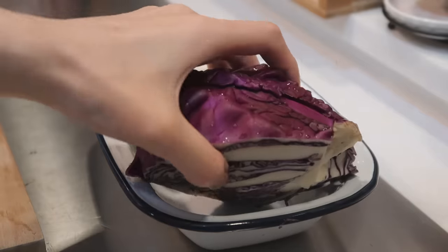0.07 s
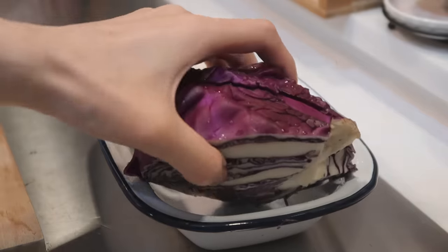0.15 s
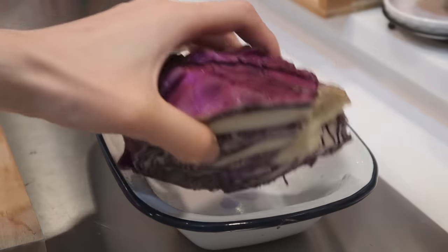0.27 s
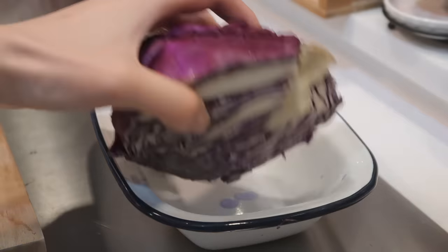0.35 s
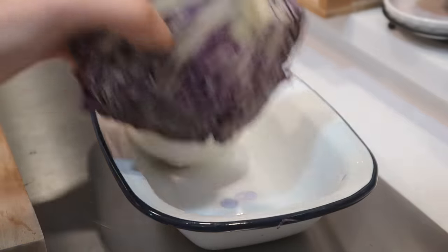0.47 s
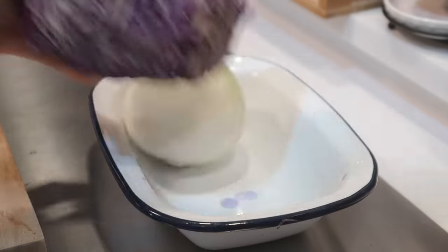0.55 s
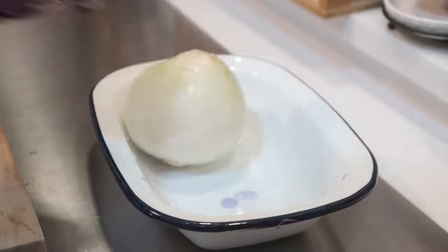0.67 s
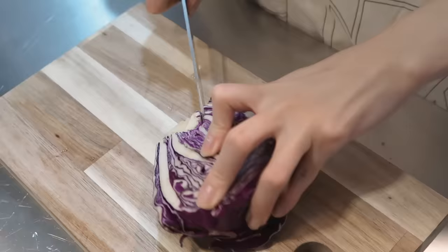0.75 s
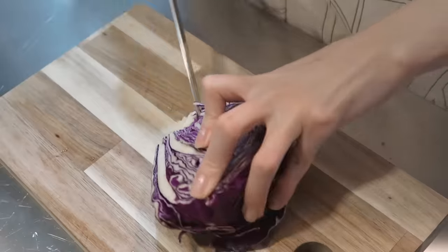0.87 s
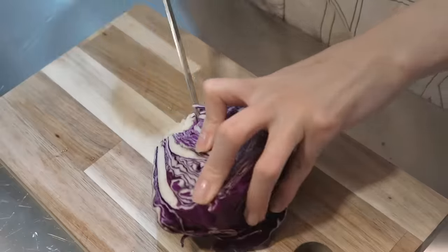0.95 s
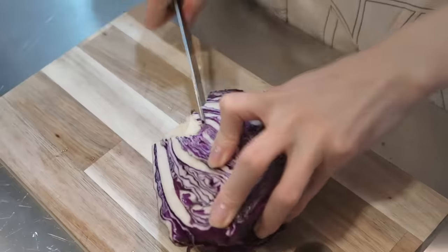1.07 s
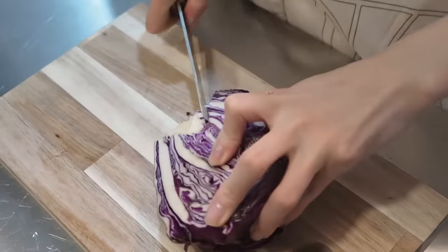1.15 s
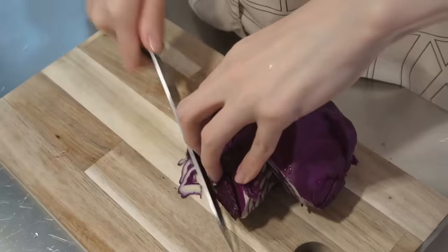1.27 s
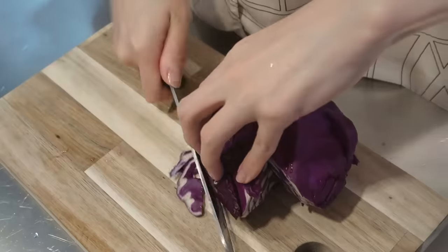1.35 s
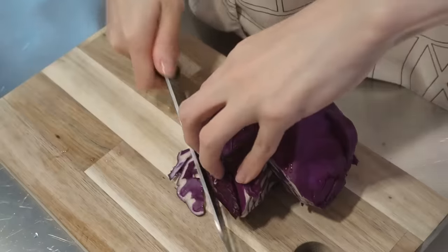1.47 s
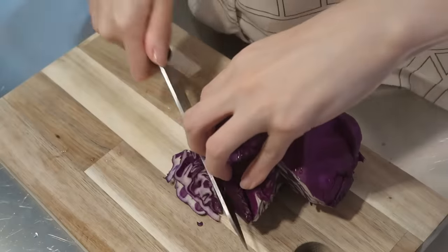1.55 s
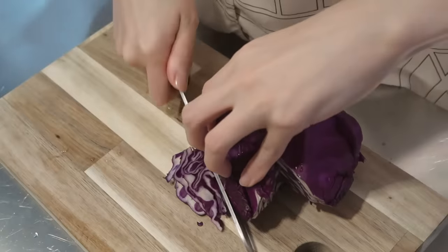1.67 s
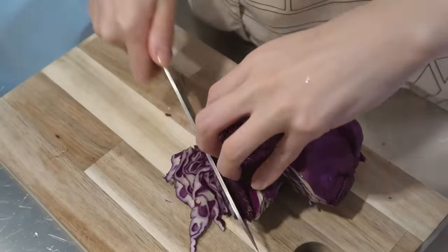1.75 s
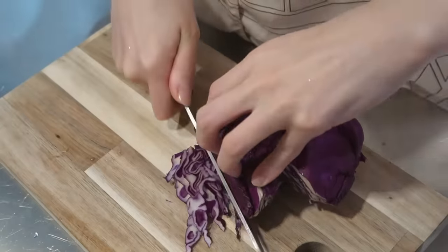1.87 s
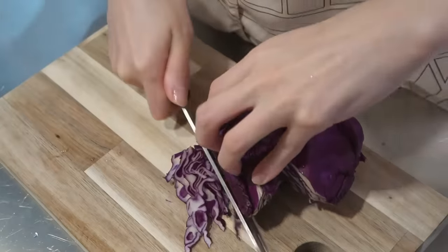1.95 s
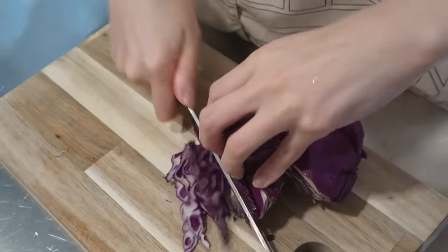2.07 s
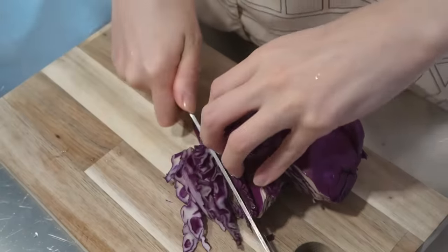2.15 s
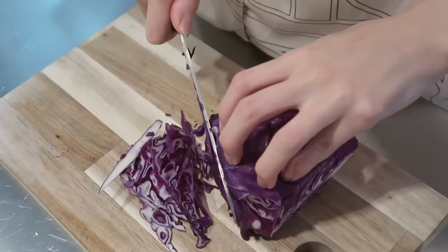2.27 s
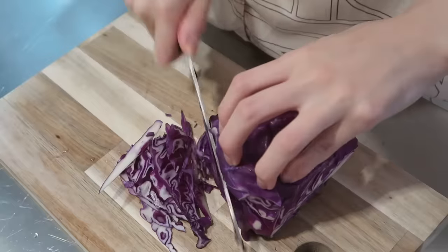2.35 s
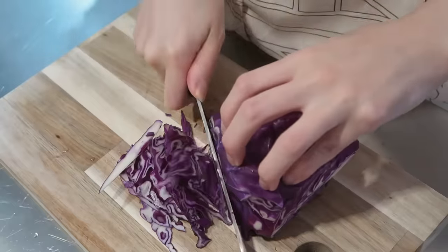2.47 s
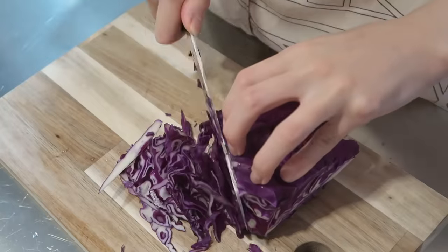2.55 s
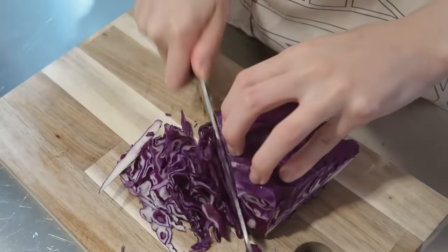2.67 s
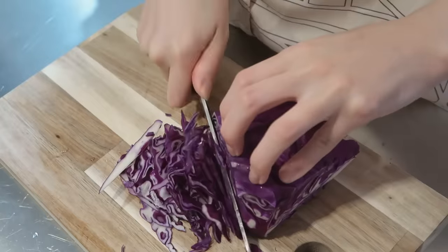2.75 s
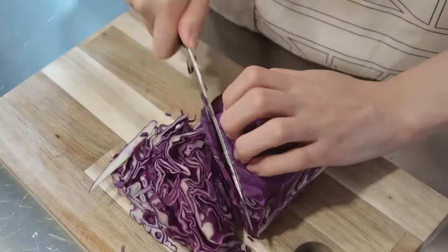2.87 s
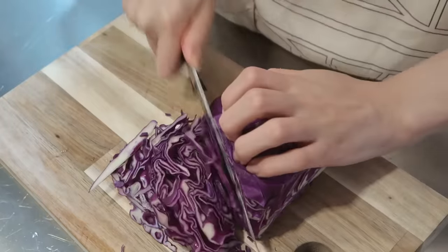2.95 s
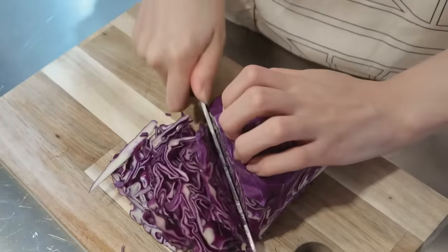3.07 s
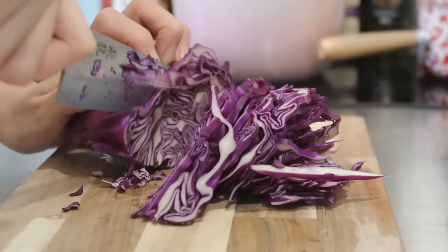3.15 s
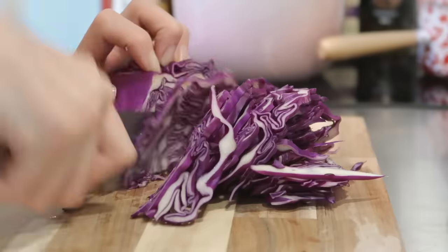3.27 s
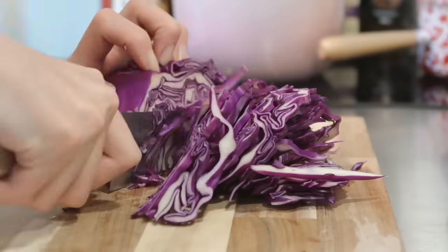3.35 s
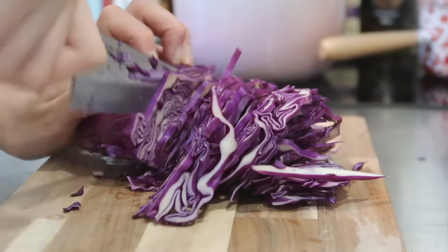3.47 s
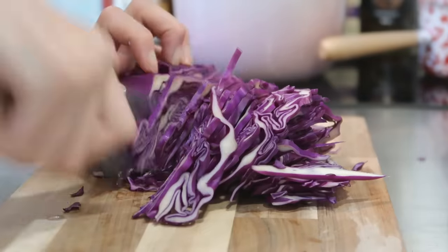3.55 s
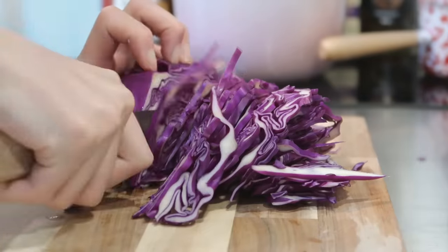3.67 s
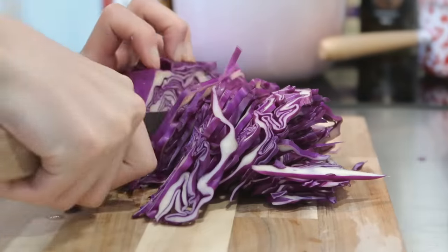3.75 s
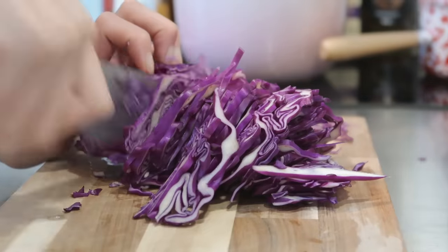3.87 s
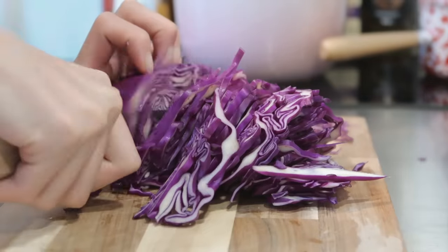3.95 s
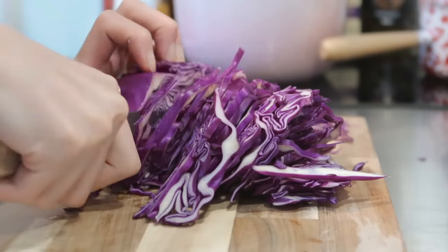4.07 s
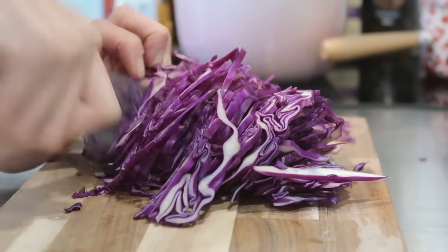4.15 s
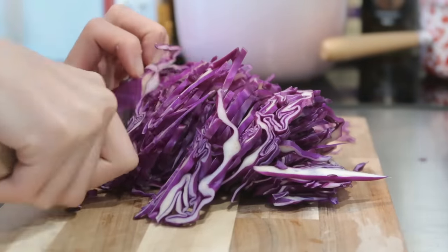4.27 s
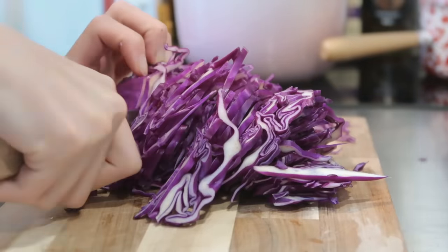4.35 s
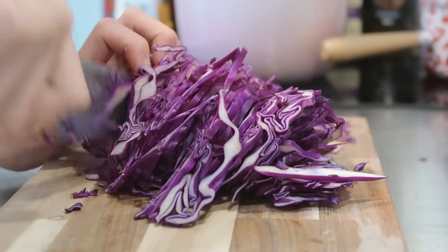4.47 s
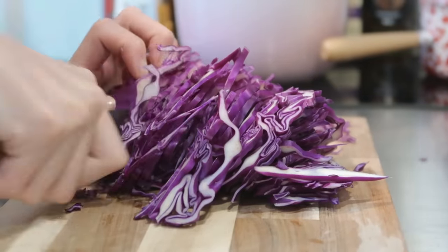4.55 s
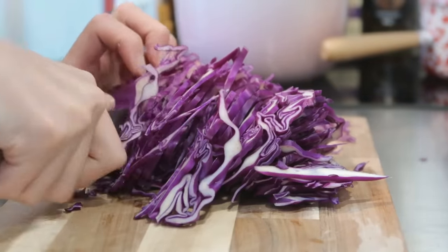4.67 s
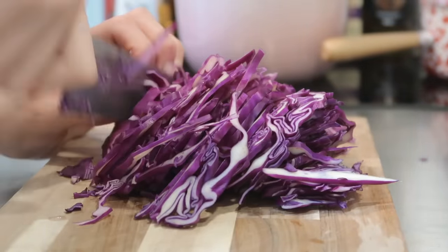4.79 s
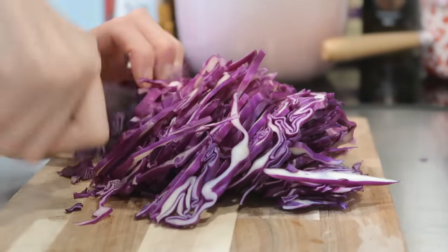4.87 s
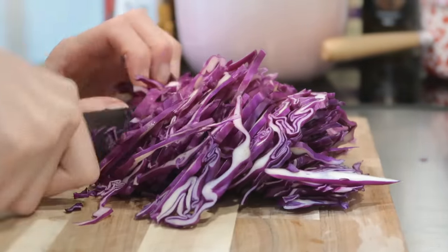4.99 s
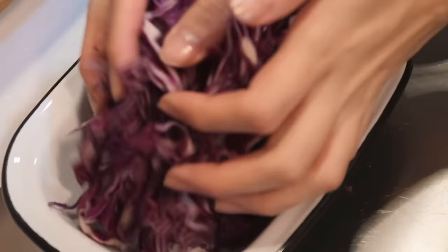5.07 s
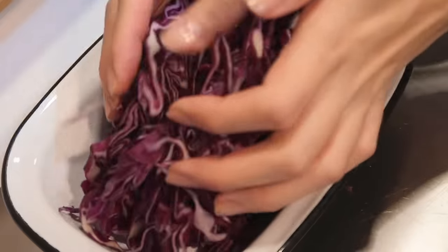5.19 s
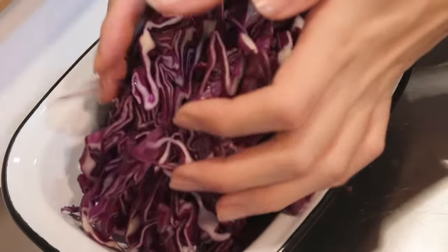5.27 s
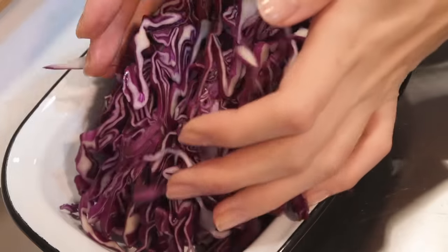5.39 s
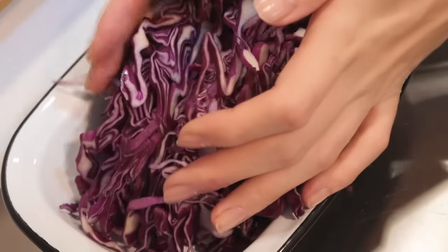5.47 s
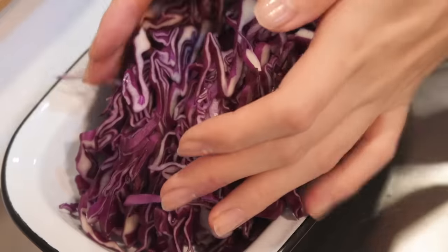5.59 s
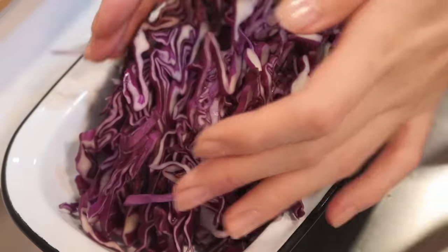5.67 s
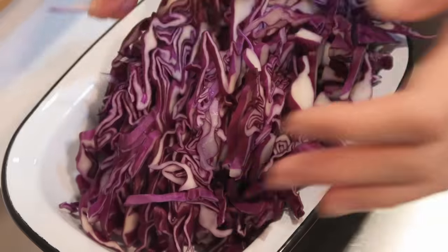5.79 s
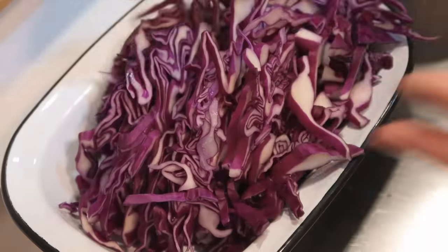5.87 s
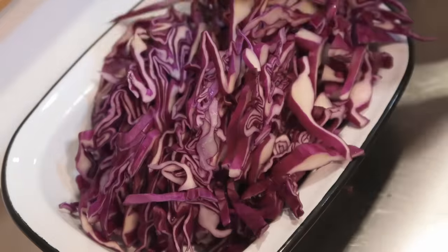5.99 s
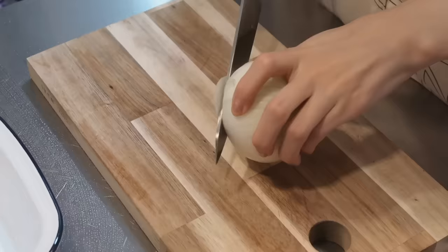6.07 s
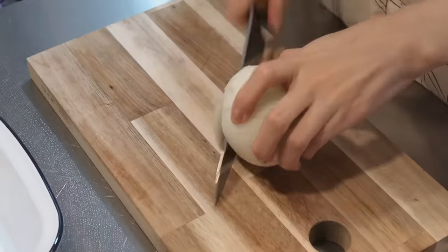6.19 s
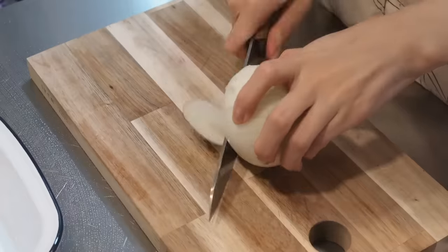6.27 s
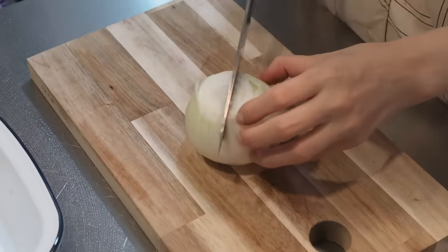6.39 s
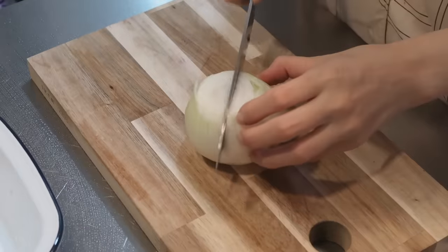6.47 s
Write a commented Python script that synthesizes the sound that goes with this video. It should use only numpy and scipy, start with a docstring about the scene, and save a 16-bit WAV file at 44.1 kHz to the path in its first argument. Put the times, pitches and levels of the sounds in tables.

```python
"""Crisp crunches and wooden knocks: a knife shreds red cabbage on a board, then starts on an onion.
Each stroke is a swelling crunch of bursting cells; most end with the blade knocking on the board,
and the walls of a small kitchen ring briefly. Behind it a refrigerator hums in the room tone,
which sinks after a knock and is back with the next stroke."""
import sys
import numpy as np
from scipy import signal
from scipy.fft import rfft, irfft
from scipy.io import wavfile
from scipy.ndimage import uniform_filter1d

SR = 44100
rng = np.random.default_rng(int(sys.argv[2]) if len(sys.argv) > 2 else 0)


def file_out(sig):
    """Save sig as 16-bit WAV at sys.argv[1]."""
    # one column per channel
    cols = np.atleast_2d(sig).T
    # limit, then scale
    lim = np.clip(cols, -1, 1)
    pcm = np.round(lim * 32767).astype(np.int16)
    wavfile.write(sys.argv[1], SR, pcm)


N = 287866

# Blade through the vegetable. Each row: bite in seconds, level in dB, through in seconds, level in dB,
# brightness in dB, rise to the bite in dB/s, final decay in dB/s, treble lost afterwards in dB.
CUT_STROKES = [(0.882, -40, 0.905, -39, -2.5, 3000, 200, 2), (1.05, -40, 1.1, -24, 1, 500, 450, 6),
               (1.3, -40, 1.35, -34.5, 3, 600, 300.5, 12.5), (1.652, -42, 1.678, -29, 5.5, 900, 400, 8),
               (1.787, -42, 1.827, -34.5, 0.5, 4998, 281, 3),
               (2.093, -42.5, 2.111, -33, 4, 699.5, 399, 7.5),
               (2.371, -43.5, 2.47, -31, -0.5, 899, 449.5, 15), (2.64, -44, 2.772, -31, 3, 700, 380, 8),
               (2.98, -40, 3.06, -29, 1, 700, 500, 12), (3.26, -38, 3.34, -26, 3, 500, 450, 11),
               (3.57, -36, 3.642, -27.5, 4, 600, 420, 10), (3.92, -37, 3.992, -27, 3, 800, 420, 9),
               (4.162, -40.5, 4.249, -29.5, 6, 1500, 309, 3), (4.55, -38, 4.585, -27, 6, 700, 450, 10),
               (4.83, -39, 4.925, -33, 7, 3000, 130, 1), (5.16, -48, 5.19, -44, 6, 700, 400, 0),
               (6.202, -31, 6.345, -31, -1, 30000, 450, 8), (6.425, -37, 6.53, -32, 0, 30000, 300, 0)]
# Edge set on the leaves. Each row: start in seconds, level in dB, fade in dB/s, brightness in dB.
LEAF_RUSTLES = [(0.81, -41.5, 62, -0.5), (0.999, -53, 346, -5), (1.205, -60.5, 124, 5), (1.268, -46, 14, 2),
                (1.485, -59, 202, 1), (1.545, -41.5, 36, 4.5), (2.025, -45, -4, 3), (2.306, -51, 304.5, 1),
                (2.586, -57, 293, 2), (2.905, -49, 100, 0.5), (3.185, -53.5, 111, 6.5),
                (3.509, -49.5, 305, 1.5), (3.74, -62, 161, 8), (3.826, -46, 165, 3.5), (4.09, -62.5, 98, 9),
                (4.426, -55.5, 103, 10), (4.743, -58, 63, 3.5), (4.801, -47, 200, 4),
                (5.057, -50, 155, 14.5), (5.104, -42.5, 53, -1.5), (6.105, -54, 37, 4.5)]
# Crunch spectra. Each row: frequency in Hz, relative density in dB.
CABBAGE_SPECTRUM = [(150, -43), (250, -19.5), (850, -12.5), (1150, -5.5), (1470, 4), (2760, 0.5),
                    (4730, -7.5), (11700, -25.5), (14900, -27), (16000, -53)]
ONION_SPECTRUM = [(300, -20), (1000, -22.5), (1600, -4), (2500, -3), (4000, 2.5), (5500, -7), (9000, -20.5),
                  (15000, -62)]
# Resonances under the blade. Each row: frequency in Hz, width in Hz, gain in dB.
CABBAGE_PEAKS = [(1260, 28, -12.5), (2150, 280, -10.5), (2700, 210, -10), (3160, 55, -10)]
ONION_PEAKS = [(2750, 320, -3.5), (3900, 410, -4), (4570, 190, -21)]
# Leaf ribs snapping or the edge touching. Each row: start in seconds, gain in dB, pitch in Hz.
RIB_SNAPS = [(0.2988, -25, 2480), (0.8275, -21, 2150), (0.852, -30.5, 2400), (0.8648, -24, 2500),
             (0.8818, -19.5, 2330), (0.8983, -13.5, 2380), (0.935, -24, 2750), (1.051, -25.5, 3080),
             (1.075, -11, 2500), (1.096, -9, 2700), (1.643, -19.5, 2090), (1.7921, -28, 2150),
             (1.81, -22, 2000), (2.4415, -19, 3000), (2.751, -18, 2500), (3.297, -20.5, 2000),
             (3.5468, -33, 2730), (3.9283, -26, 1644), (3.941, -19.5, 2700), (4.1602, -31.5, 2610),
             (4.559, -30.5, 2480), (4.827, -20, 2020), (4.992, -17.5, 2130), (5.178, -28, 2870),
             (6.16, -25, 3800), (6.2022, -11.5, 3900), (6.2399, -5.5, 3660), (6.327, -19.5, 3660)]
# Blade on the board. Each row: start in seconds, gain in dB, six band gains in dB, bounce gain in dB.
BOARD_KNOCKS = [(1.102, -2.5, -8.5, -15.5, -9.5, 2.5, -1, -9, -8.5),
                (1.367, -2.5, -14, -21, -6, -5.5, 1.5, -7, -22),
                (1.6861, 2, -15.5, -24, -6, -5.5, -0.5, -4.5, -14),
                (1.853, -0.5, -19, -18.5, -8.5, -10, -0.5, -2.5, -13.5),
                (2.114, -3.5, -17, -19, -9.5, -6.5, -0.5, -7, -21.5),
                (2.461, -2.5, -15, -19.5, -3.5, -6.5, -1.5, -8.5, -22),
                (2.7708, 0.5, -20.5, -17, -11, -3, -1, -6, -19),
                (3.06, -2.5, -12.5, -14.5, -10, 5.5, -4.5, -6, -13.5),
                (3.343, -7.5, -19.5, -7.5, -10, -2, -4, -29, -9.5),
                (3.643, -3.5, -26.5, -8.5, -13.5, -6.5, -7, -18, -10.5),
                (3.993, -6, -33, -5, -15.5, -4.5, -12, -32, -11.5),
                (4.2567, -7.5, -14, -2.5, -10.5, -2.5, -16.5, -18, -11.5),
                (4.5878, -2, -22.5, -9, -15, -4, -17.5, -34, -11),
                (4.9254, -13, -29, -3, -17.5, -24, -40, -10, -1.5),
                (5.082, -25, -3, 6, -13, -4, -25, -24, -9.5),
                (5.106, -20, 3.5, -4.5, -1.5, -13.5, -18, -35, -10),
                (6.2659, -0.5, -5, -6.5, -26, -6.5, -4.5, -22, -7)]
# Centres of those six bands in Hz.
KNOCK_CENTRES_HZ = [280, 480, 730, 1100, 2500, 6000]
# A deep thump, then the board's modes. Each row: frequency in Hz, gain in dB, T60 in seconds.
KNOCK_RESONANCES = [(55.6, -17.5, 0.072), (258, -17.5, 0.073), (339, -19.5, 0.12), (449.2, -9, 0.074),
                    (569.3, 0, 0.041), (736, 3, 0.02), (954, -5, 0.038), (1026, -8.5, 0.04),
                    (1120, -5.5, 0.031), (1242, -3.5, 0.028), (1350, -9, 0.026), (1680, -5.5, 0.022),
                    (2090, -9.5, 0.019), (2364, 1.5, 0.015), (2480, 1, 0.0094), (2554, 3, 0.014),
                    (3040, -7, 0.0022), (3066, -12, 0.025)]
# Walls answering a knock. Each row: frequency in Hz, gain in dB, T60 in seconds.
WALL_RING = [(254, -33.5, 0.45), (525, -17.5, 0.23), (990, -22, 0.15), (1700, -21.5, 0.1),
             (2500, -21.5, 0.073), (5000, -31.5, 0.098), (10080, -35.5, 0.068)]
# Room tone envelope. Each row: return in seconds, top level in dB, sink start in seconds, sink in dB/s.
ROOM_SWELLS = [(0, -46.5, .78, 0), (.79, -52.5, 1.152, 115), (1.27, -53, 1.33, 60), (1.55, -47, 1.69, 52),
               (2.03, -55, 2.08, 50), (2.31, -47, 2.46, 200), (2.59, -47, 2.77, 170), (2.91, -57, 3.07, 5),
               (3.19, -49, 3.33, 35), (3.51, -50, 3.6, 40), (3.83, -50, 3.97, 5), (4.8, -45, 4.93, 1),
               (6.11, -45, 6.25, 14)]
# Air noise. Each row: frequency in Hz, relative density in dB.
AIR_SPECTRUM = [(12, -40.5), (24, -9), (107, -8.5), (347, -19), (422, -24), (574, -12.5), (678, -27.5),
                (873, -23), (2910, -38), (10500, -52), (16000, -64.5)]
# Two hum lines and a low room rumble. Each row: frequency in Hz, width in Hz, steady share from 0 to 1.
HUM_AND_RUMBLE = [(118.5, 7.8, 0.79), (582, 13, 0.2), (54, 32, 0.3)]
# Their balance. Each row: time in seconds, then the gain of each over the air noise in dB.
HUM_AND_RUMBLE_GAINS = [(.78, 4, -13, -11), (0.801, -1.5, -5.5, -5.5), (5.1, 1.5, -13.5, -5.5),
                        (5.201, -6, -20, -2.5)]
# Scattered sound. Each row: frequency in Hz, gain against the shared sound in dB.
SCATTER_SPECTRUM = [(30, -22), (60, -34.5), (150, -16.5), (300, -6), (600, -16), (1200, -12.5),
                    (2000, -21.5), (4000, -2), (8000, 2), (12000, 6.5)]

ONION_FROM_S = 6.1
DULLING_S, RUSTLE_STOP_DB_PER_S = 0.049, 600
CLUMPS_DB, CLUMP_S = 1, 0.0089   # leaves give way unevenly, pitch by pitch
TEARS_DB, TEAR_S = 1.5, 0.007   # whole layers tear at once
BANDS_DB, BAND_S = 0.88, 0.046   # some pitches stand out for a while
CRACKLE_PER_S, CRACKLE_DB = 180, -1   # fibres snap across many pitches at once
CONTACT_LOW_RATIO, CONTACT_TOP_HZ = 0.41, 4900   # drive band of the soft landing
HOLLOW_BELOW_HZ, HOLLOW_FIRST_DB, HOLLOW_BOUNCE_DB = 650, -1, 7.5   # low resonances favour the bounce
DETUNE = 0.027   # modes shift with the place of the blow and the load of leaves
BLADE_HZ, BLADE_WIDTH_HZ, BLADE_DB, BLADE_T60_S = 2660, 110, -29, 0.16
FAR_RING_DB, FAR_RING_T60_S = -37.5, 0.55
ROOM_RISE_DB_PER_S = 51
LEFT_LAG_S = 14e-6
CABBAGE_CEILING, ONION_CEILING, CUTOFF_HZ = 0.55, 0.51, 16800


def crunch(bursts_per_s, spread_db, ring_cycles, swell_cycles):
    """Cells burst at random; each rings a few cycles at a pitch of its own."""
    level_db, bright_db = crunch_envelope()
    clumps_db = CLUMPS_DB * wander(CLUMP_S) + BANDS_DB * wander(BAND_S)
    tears_db = TEARS_DB * wander(TEAR_S)
    crackle = (rng.random(N) < CRACKLE_PER_S / SR) * amp(CRACKLE_DB + 2.4 * rng.standard_normal(N))
    crackle *= rng.choice([-1, 1], N)
    bursts = (rng.random(N) < bursts_per_s / SR) * amp(spread_db * np.minimum(rng.exponential(1, N), 4))
    bursts *= rng.choice([-1, 1], N)
    pitches_hz, burst_band = np.geomspace(300, 15000, num=24), rng.integers(0, 24, N)
    cabbage = amp(at_hz(CABBAGE_SPECTRUM, pitches_hz)) * np.sqrt(pitches_hz)
    onion = amp(at_hz(ONION_SPECTRUM, pitches_hz)) * np.sqrt(pitches_hz)
    on_onion = np.arange(N) >= ONION_FROM_S * SR
    out = np.zeros(N)
    for k, hz in enumerate(pitches_hz):
        clicks = bursts * (burst_band == k) + crackle * (1000 < hz < 7000) / 2
        cells = ring(ring(clicks, hz, ring_cycles / hz), hz, swell_cycles / hz)
        weight = np.where(on_onion, onion[k] / np.linalg.norm(onion),
                          cabbage[k] / np.linalg.norm(cabbage))
        treble_octaves = np.clip(np.log2(hz / 2600), 0, 1.3)
        band_db = level_db + treble_octaves * bright_db + tears_db + np.roll(clumps_db, k * N // 24)
        out += weight * amp(band_db) * rms_one(cells)
    return np.where(on_onion, amp(-3) * rasp(out, ONION_PEAKS), amp(-1.9) * rasp(out, CABBAGE_PEAKS))


def crunch_envelope():
    """Level and brightness in dB of the loudest rustle or cut at each moment."""
    t, shapes = np.arange(N) / SR, []
    ends_s = np.array(CUT_STROKES)[:, 2]
    for start_s, db, fade, tilt_db in LEAF_RUSTLES:
        after_cut_s = np.maximum(t - ends_s[ends_s > start_s].min(), 0)
        rustle_db = db - fade * (t - start_s) - RUSTLE_STOP_DB_PER_S * after_cut_s
        shapes.append((np.where(t >= start_s, rustle_db, -120.), tilt_db))
    for bite_s, bite_db, through_s, through_db, tilt_db, rise, decay, dulling_db in CUT_STROKES:
        early_s, late_s = np.maximum(bite_s - t, 0), np.maximum(t - through_s, 0)
        cut_db = np.interp(t, [bite_s, through_s], [bite_db, through_db])
        lost_db = dulling_db * np.minimum(late_s / DULLING_S, 1)
        shapes.append((cut_db - rise * early_s - decay * late_s, tilt_db - lost_db))
    level_db, bright_db = np.full(N, -120.), np.zeros(N)
    for db, tilt_db in shapes:
        bright_db = np.where(db > level_db, tilt_db, bright_db)
        level_db = np.maximum(db, level_db)
    return level_db, bright_db


def rasp(x, peaks):
    """Resonances under the blade colour the crunch."""
    return x + sum(amp(db) * resonate(x, hz, width_hz) for hz, width_hz, db in peaks)


def knocks(uneven_db, bounce_s):
    """The edge cracks on the wood; board and walls ring, the blade shivers on."""
    out, t = np.zeros(N + SR), np.arange(round(.4 * SR)) / SR
    for start_s, db, *bands_db, bounce_db in BOARD_KNOCKS:
        colour = np.transpose([KNOCK_CENTRES_HZ, bands_db])
        crack = bandpass(rng.standard_normal(len(t)) * np.exp(-t / 0.0013), 3600, 12000)
        blow = amp(bands_db[-1] - 4.5) * crack
        blow += knock_ring(t, colour, uneven_db, bounce_s, bounce_db)
        blow += wall_ring(t, colour)
        shiver = resonate(rng.standard_normal(len(t)), BLADE_HZ, BLADE_WIDTH_HZ)
        blow += amp(BLADE_DB - 60 * t / BLADE_T60_S) * rms_one(shiver)
        at = round(start_s * SR)
        out[at:at + len(t)] += amp(db) * blow
    return out[:N]


def knock_ring(t, colour, uneven_db, bounce_s, bounce_db):
    """A soft landing and one bounce drive a deep thump and the board's modes."""
    out = np.zeros(len(t))
    for hz, db, t60_s in KNOCK_RESONANCES:
        contact, hollow = np.zeros(len(t)), hz < HOLLOW_BELOW_HZ
        touches_db = [hollow * HOLLOW_FIRST_DB, bounce_db + hollow * HOLLOW_BOUNCE_DB]
        signs = rng.choice([-1, 1], size=2)
        contact[[0, round(bounce_s * SR)]] = signs * amp(touches_db + rng.normal(0, uneven_db, 2))
        drive = bandpass(contact, CONTACT_LOW_RATIO * hz, CONTACT_TOP_HZ)
        detuned_hz = hz * (1 + DETUNE * rng.standard_normal())
        out += amp(db + at_hz(colour, hz)) * ring(drive, detuned_hz, t60_s)
    return out


def snaps():
    """A rib snaps: a click and a weaker rattle ring briefly at three pitches."""
    out, t = np.zeros(N), np.arange(round(0.035 * SR)) / SR
    for start_s, db, hz in RIB_SNAPS:
        clicks = amp(-16) * rng.standard_normal((3, len(t))) * np.exp(-t / 0.0092)
        clicks[:, 0] = 1
        clicks = signal.lfilter([.5], [1, -.5], clicks)   # soft edge
        snap = ring(clicks[0], hz, t60_s=0.01)
        snap += 0.7 * ring(clicks[1], 1.35 * hz, t60_s=0.0041)
        snap += 0.31 * ring(clicks[2], 0.51 * hz, t60_s=0.015)
        at = round(start_s * SR)
        out[at:at + len(t)] += amp(db - 10.5) * snap
    return out


def wall_ring(t, colour):
    """Walls answer a knock: half-octave noise bands decay over a fainter, longer tail."""
    out, white = np.zeros(len(t)), rng.standard_normal((2, len(t)))
    edges_hz = 200 * 2 ** np.arange(0, 6.4, .5)
    onset = 1 - np.exp(-t / 0.0009)
    far = amp(FAR_RING_DB - 60 * t / FAR_RING_T60_S)
    for k, (low_hz, high_hz) in enumerate(zip(edges_hz, edges_hz[1:])):
        hz = np.sqrt(low_hz * high_hz)
        near = amp(-60 * t / at_hz(WALL_RING, hz, column=2))
        band = rms_one(bandpass(white[k % 2], low_hz, high_hz))
        out += amp(at_hz(WALL_RING, hz) + at_hz(colour, hz)) * onset * (near + far) * band
    return out


def room_tone():
    """Coloured air noise, two wavering hum lines and a low room rumble."""
    t = np.arange(N) / SR
    tone = rms_one(irfft(rfft(rng.standard_normal(N)) * amp(at_hz(AIR_SPECTRUM, bins_hz())), N))
    times_s, *gains_db = np.transpose(HUM_AND_RUMBLE_GAINS)
    for (hz, width_hz, steady), db in zip(HUM_AND_RUMBLE, gains_db):
        line = np.sqrt(2) * np.sin(2 * np.pi * hz * t)
        waver = rms_one(ring(rng.standard_normal(N), hz, t60_s=np.log(1000) / (np.pi * width_hz)))
        tone += amp(np.interp(t, times_s, db)) * (steady * line + (1 - steady) * waver)
    return amp(room_level_db(t)) * tone


def room_level_db(t):
    """The room tone returns, swells a little, then sinks until the next return."""
    return_s, top_db, sink_s, sink_db_per_s = np.transpose(ROOM_SWELLS)
    row = np.maximum(np.searchsorted(return_s, t, side="right") - 1, 0)
    early_s = np.clip(sink_s[row] - t, 0, .15) * (row > 1)   # no swell in the first two rows
    late_s = np.maximum(t - sink_s[row], 0)
    return top_db[row] - ROOM_RISE_DB_PER_S * early_s - sink_db_per_s[row] * late_s


def ring(clicks, hz, t60_s):
    """A unit click starts a decaying sine of height 1."""
    r, w = amp(-60 / (t60_s * SR)), 2 * np.pi * hz / SR
    return signal.lfilter([0, np.sin(w)], [1, -2 * r * np.cos(w), r * r], clicks + 1e-18)


def resonate(x, hz, width_hz):
    """Resonance with unit peak gain."""
    return signal.lfilter(*signal.iirpeak(hz, hz / width_hz, fs=SR), x)


def bandpass(x, low_hz, high_hz):
    """Band-pass, 12 dB per octave."""
    return signal.sosfilt(signal.butter(2, [low_hz, high_hz], "band", fs=SR, output="sos"), x)


def wander(seconds):
    """Smooth random drift, rms 1."""
    width = round(seconds * SR)
    return rms_one(uniform_filter1d(uniform_filter1d(rng.standard_normal(N), width), width))


def at_hz(table, hz, column=1):
    """Table value on a log-frequency axis."""
    table = np.array(table)
    return np.interp(np.log(hz), np.log(table[:, 0]), table[:, column])


def bins_hz():
    """FFT bin frequencies."""
    return np.maximum(np.arange(N // 2 + 1) * SR / N, 1)


def amp(db):
    """dB to gain."""
    return 10 ** (np.asarray(db) / 20)


def rms_one(x):
    """Scale to rms 1."""
    return x / np.sqrt(np.mean(x ** 2) + 1e-20)


def scene():
    """All sources reach two close microphones a moment apart, plus scatter in opposite phase."""
    leaves = crunch(bursts_per_s=16000, spread_db=1.5, ring_cycles=9.3, swell_cycles=2.4) + snaps()
    board = knocks(uneven_db=2.0, bounce_s=.0065)
    shared = leaves + board + room_tone()
    spectrum, half_lag = rfft(shared), np.exp(1j * np.pi * bins_hz() * LEFT_LAG_S)
    scatter_gain = amp(at_hz(SCATTER_SPECTRUM, bins_hz()))
    scatter = irfft(1j * rfft(shared - board / 2) * scatter_gain, N)   # knocks scatter half as much
    scatter *= wander(.018)   # scattered paths keep no steady phase
    return np.array([irfft(spectrum / half_lag, N) + scatter, irfft(spectrum * half_lag, N) - scatter])


def record(dry):
    """Soft overload on the hardest knocks, then a steep low-pass."""
    ceiling = np.where(np.arange(N) < ONION_FROM_S * SR, CABBAGE_CEILING, ONION_CEILING)
    limited = dry / (1 + np.abs(dry / ceiling) ** 4) ** .25
    return signal.sosfilt(signal.cheby2(12, 70, CUTOFF_HZ, fs=SR, output="sos"), limited)


dry = scene()
out = record(dry)
file_out(out)
```